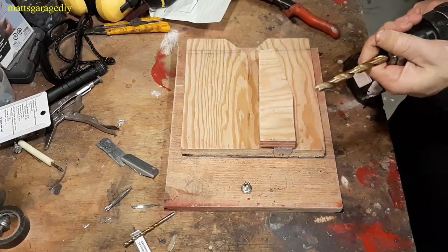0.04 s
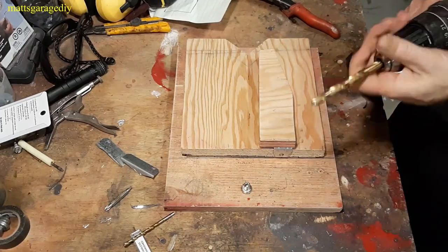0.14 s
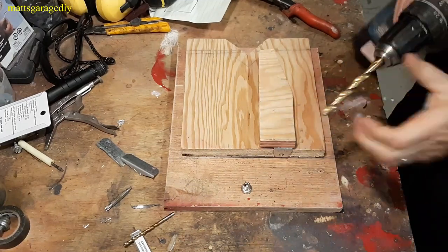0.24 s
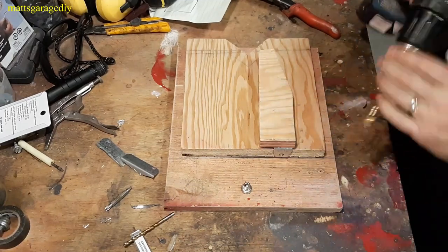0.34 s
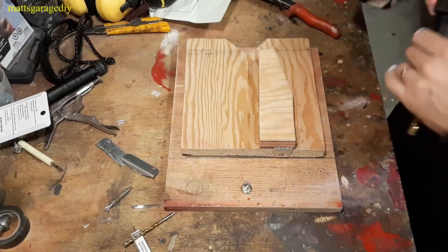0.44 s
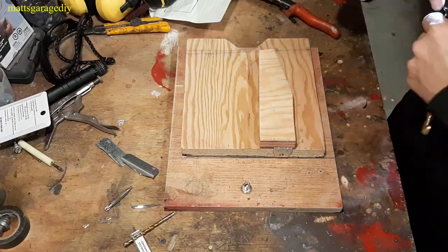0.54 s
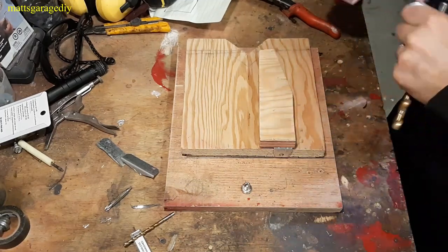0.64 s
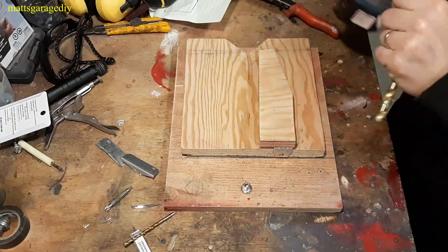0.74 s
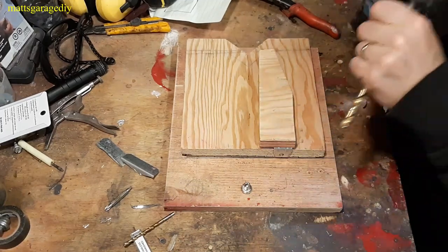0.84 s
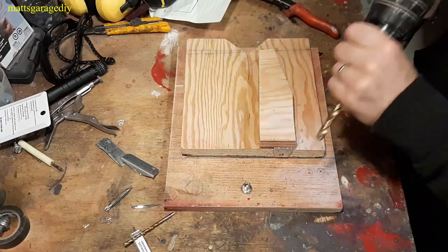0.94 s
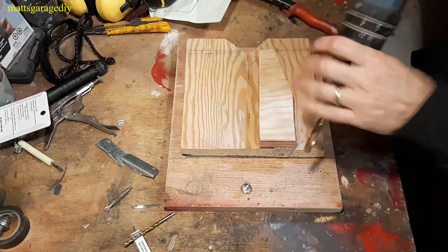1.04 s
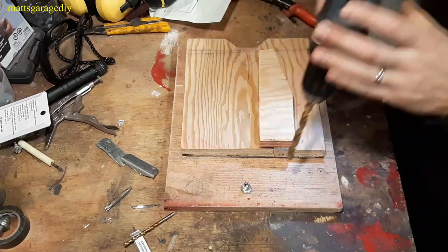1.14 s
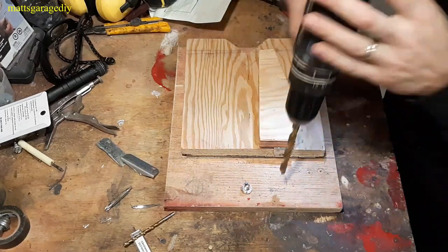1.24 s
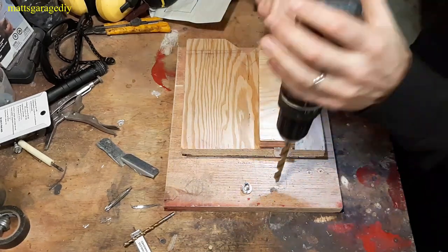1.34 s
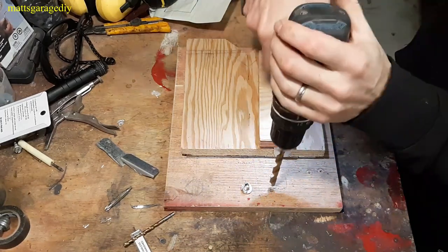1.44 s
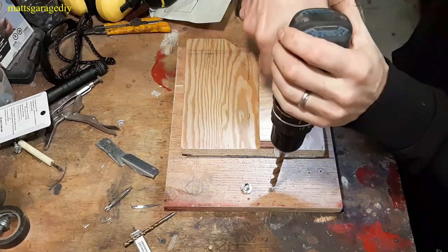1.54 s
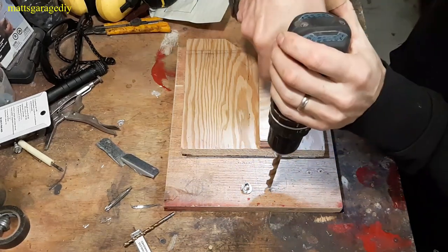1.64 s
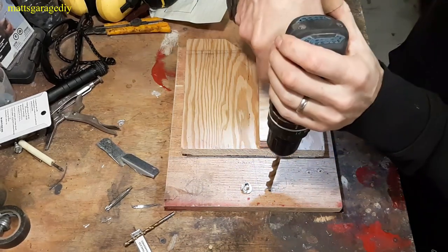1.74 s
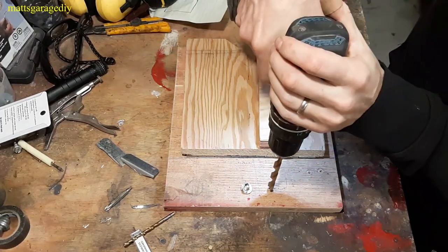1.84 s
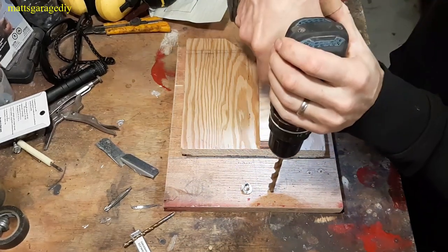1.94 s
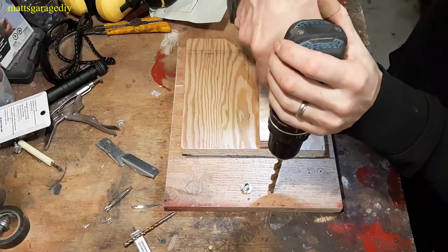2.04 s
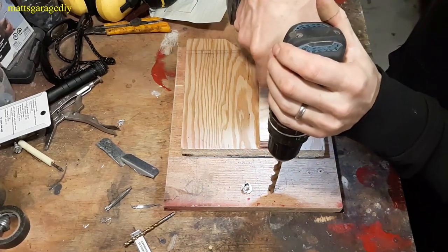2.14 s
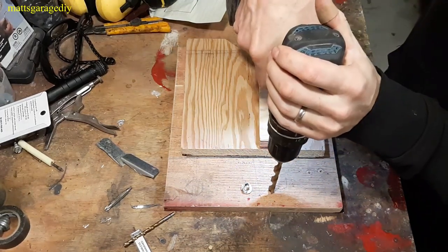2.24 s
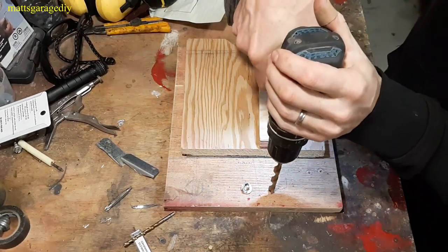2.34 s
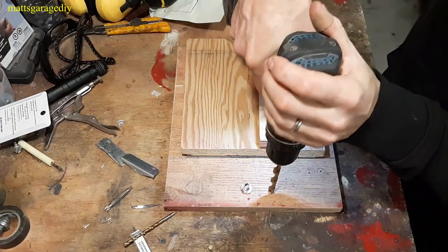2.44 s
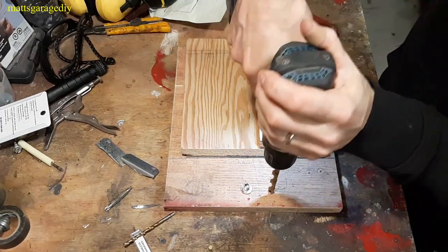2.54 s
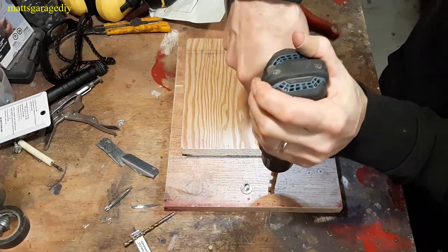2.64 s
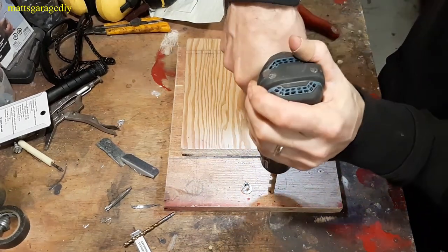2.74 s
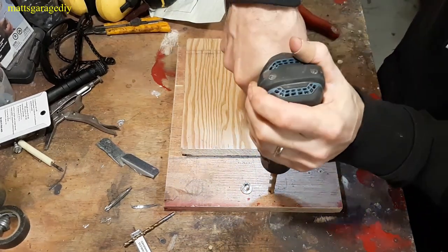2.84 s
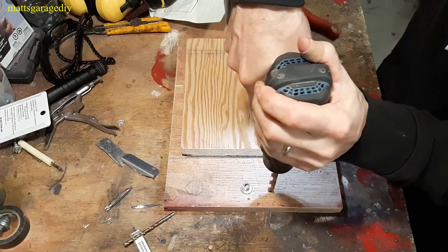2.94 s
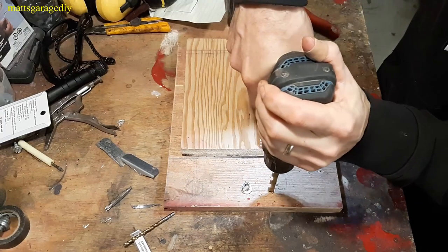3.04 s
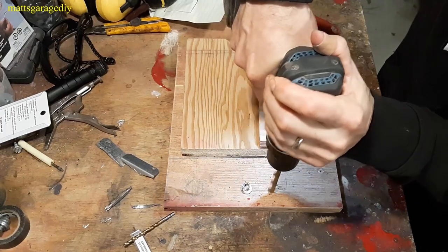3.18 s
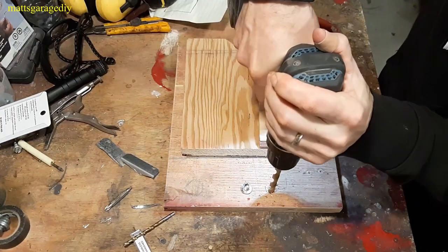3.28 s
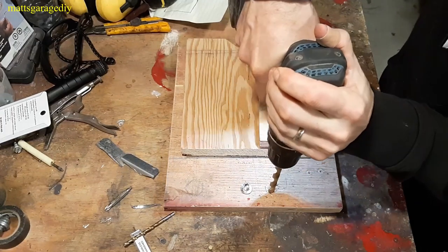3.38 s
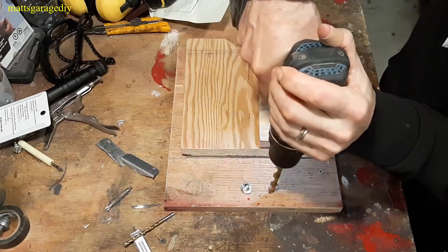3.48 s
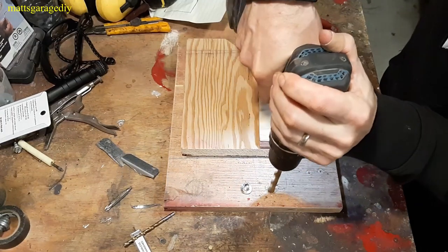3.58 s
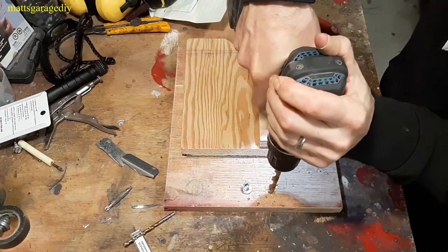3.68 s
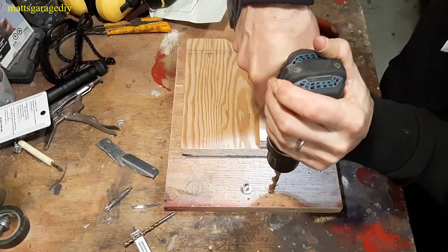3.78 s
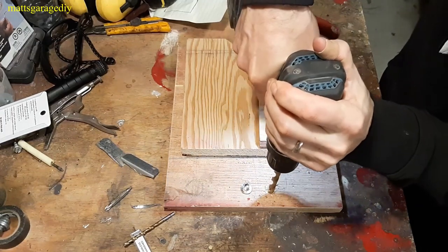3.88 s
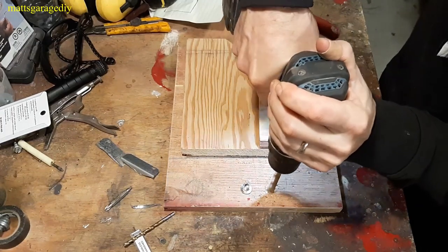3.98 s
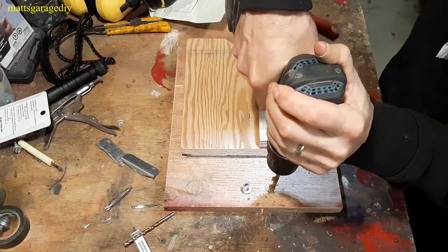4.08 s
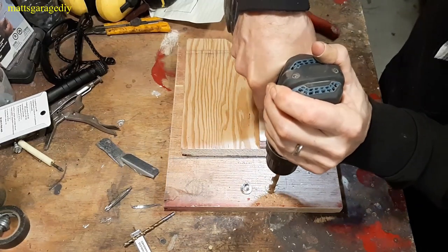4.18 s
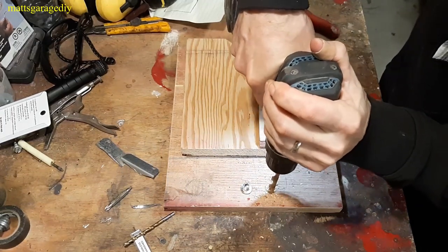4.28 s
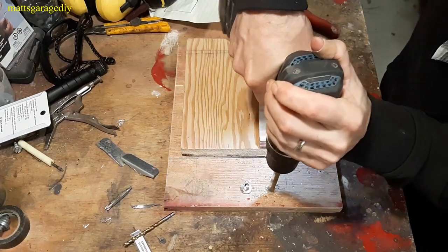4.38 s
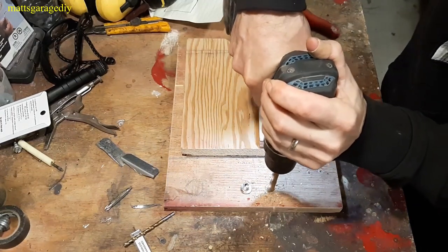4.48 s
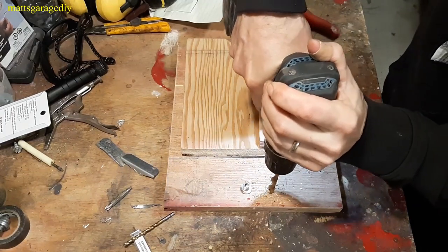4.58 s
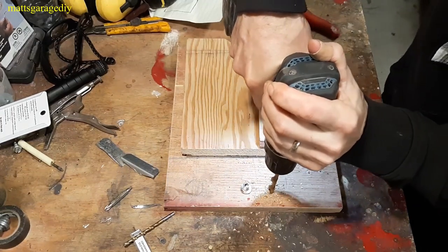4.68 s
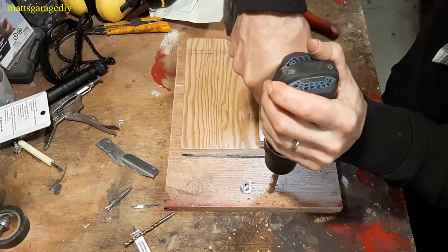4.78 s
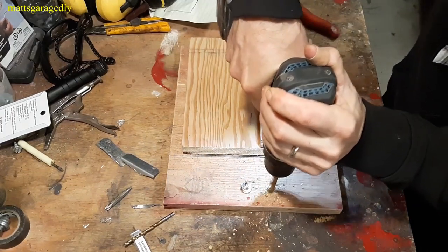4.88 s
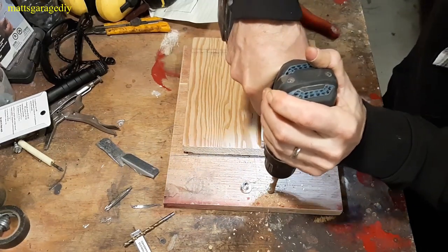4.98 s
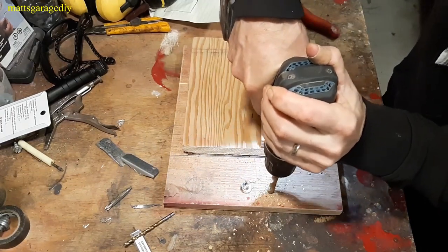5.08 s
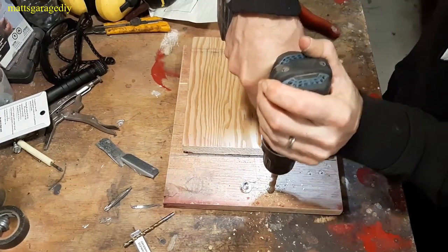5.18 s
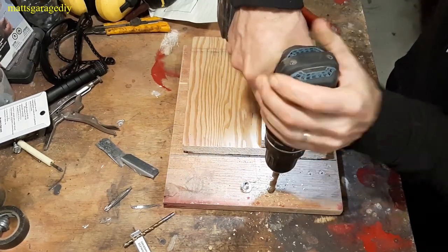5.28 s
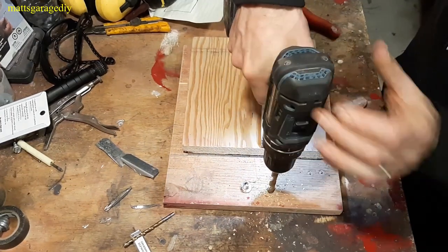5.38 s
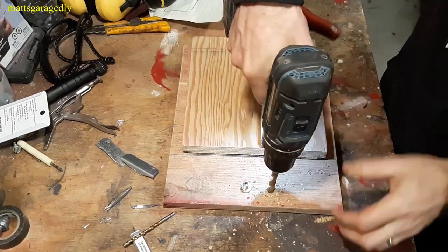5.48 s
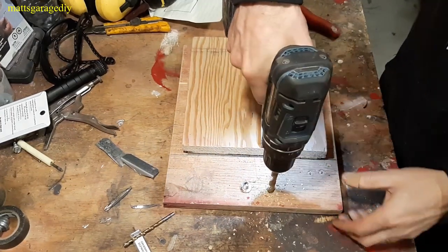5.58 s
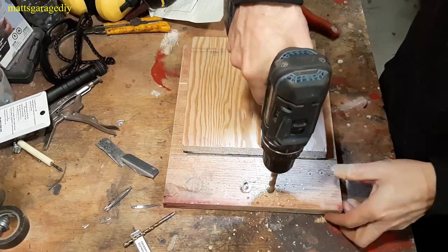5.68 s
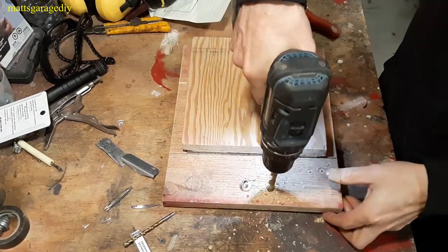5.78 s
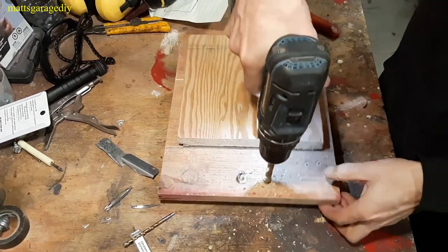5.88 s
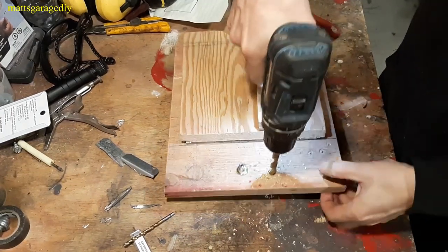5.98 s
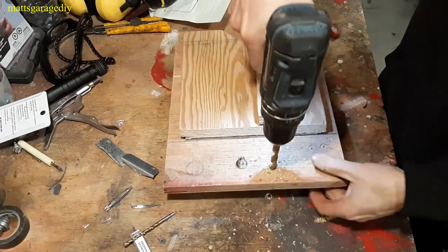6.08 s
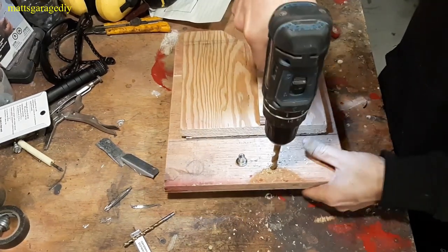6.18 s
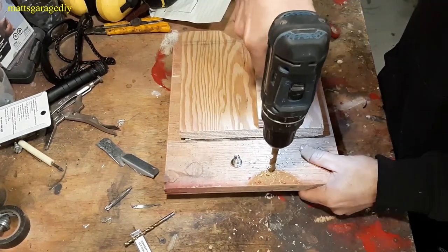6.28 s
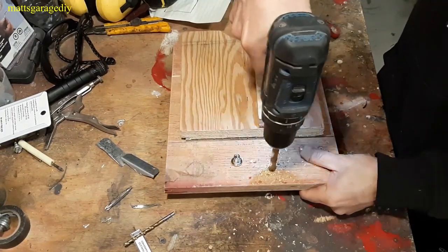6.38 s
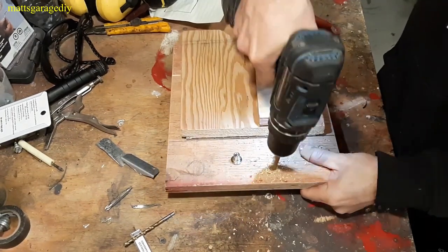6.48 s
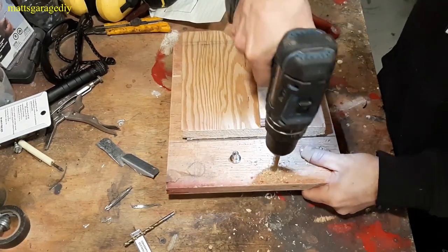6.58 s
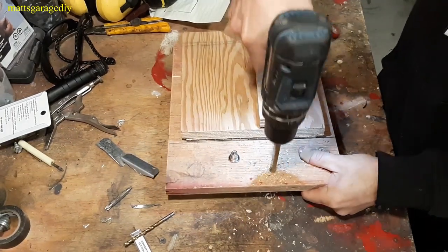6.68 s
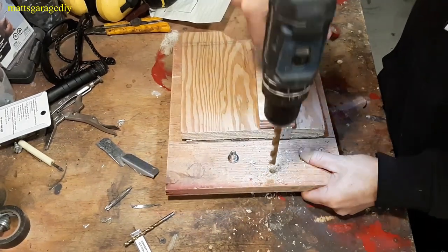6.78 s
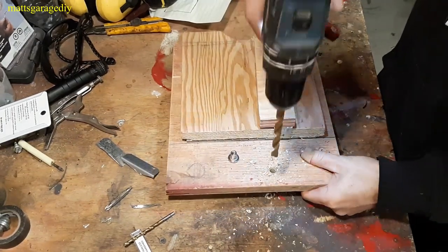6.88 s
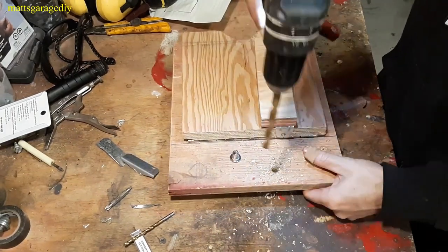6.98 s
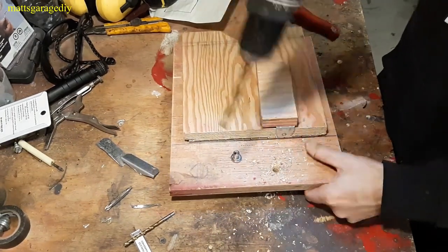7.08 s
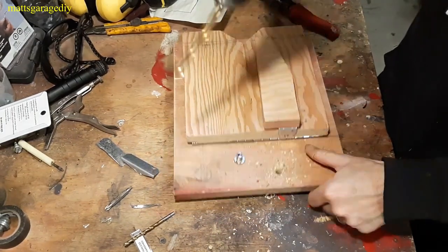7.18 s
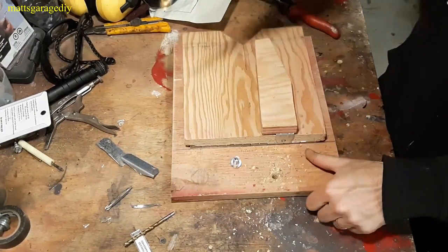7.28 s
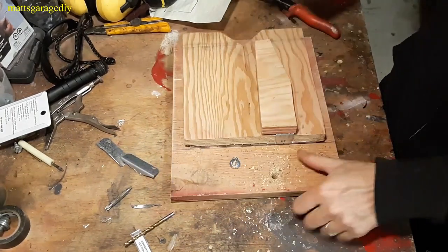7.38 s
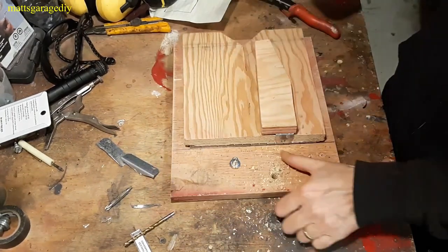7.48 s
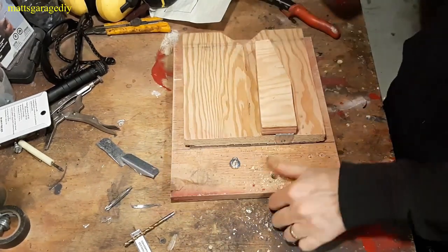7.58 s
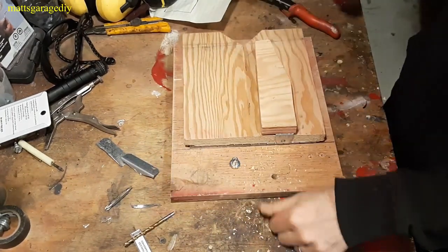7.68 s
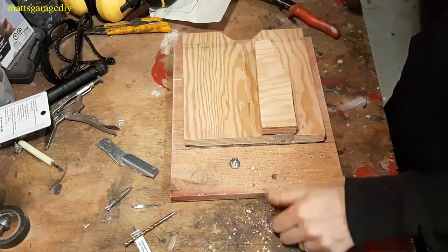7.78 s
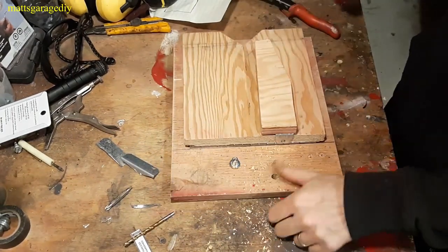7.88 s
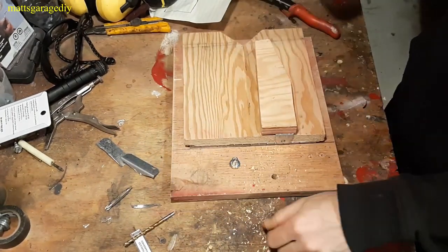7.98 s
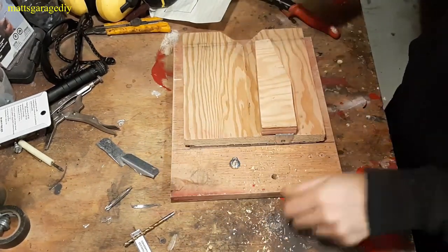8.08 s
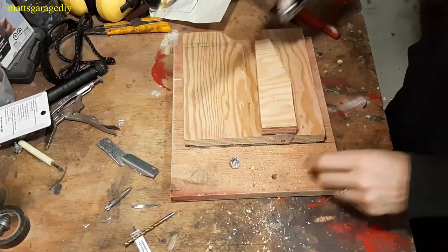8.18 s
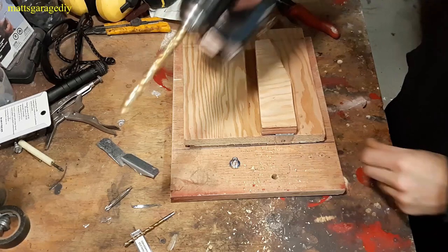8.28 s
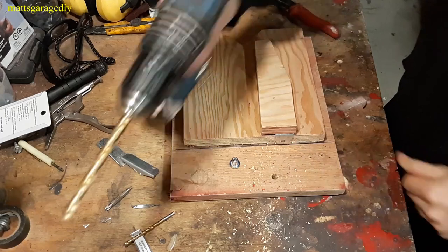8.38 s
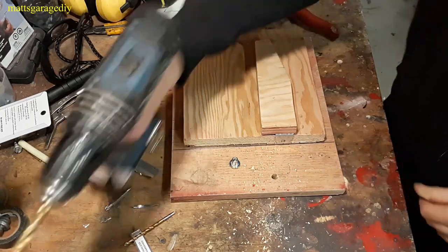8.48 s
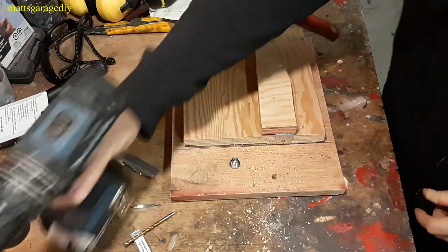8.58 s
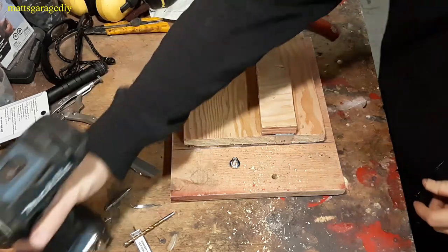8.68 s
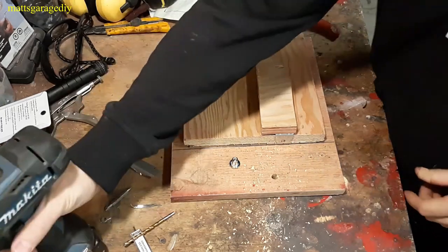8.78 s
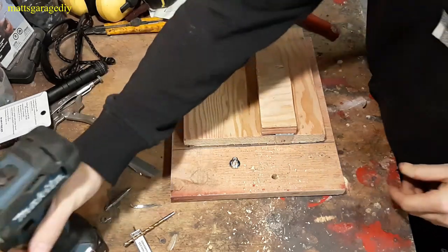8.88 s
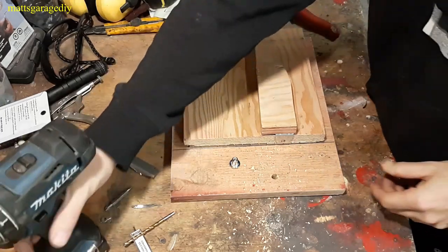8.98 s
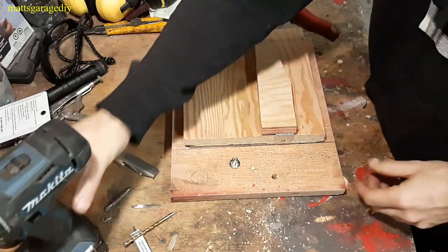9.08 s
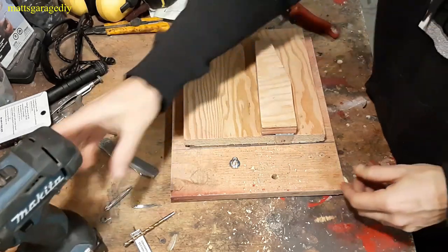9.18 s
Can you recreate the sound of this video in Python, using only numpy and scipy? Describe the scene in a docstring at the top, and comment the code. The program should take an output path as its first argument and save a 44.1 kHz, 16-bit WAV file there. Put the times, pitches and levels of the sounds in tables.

```python
"""Cordless drill in a small garage

A cordless drill is pulsed into a board on a workbench, then reversed out. Sine tones for the gear
whine and shaped noise for the rattle follow the motor speed. Clicks are short noise ticks, bench
thuds are dying sines, and a hand brushing chips off the board is clumpy noise.
Behind them are echoes of the garage, soft room noise and the wavering hum of an appliance."""
import sys
import numpy as np
from scipy import signal
from scipy.fft import rfft, irfft, next_fast_len
from scipy.io import wavfile
from scipy.ndimage import uniform_filter1d

SR = 44100
rng = np.random.default_rng(int(sys.argv[2]) if len(sys.argv) > 2 else 0)


def persist_wave(psi):
    """Save psi, clipped to +-1, as 16-bit WAV."""
    counts = np.round(np.clip(psi, -1, 1) * 32767).astype(np.int16)
    wavfile.write(sys.argv[1], SR, np.atleast_2d(counts).T)


N = 407043  # length in samples

REVERSED_FROM_S = 6  # pulls after this time run backwards
# Ways the board likes to shake. Each row: pitch in Hz, width in Hz, level in dB.
BOARD_MODES = [(690, 50, -3), (1100, 90, 1), (1430, 60, -7), (2050, 90, -5), (2370, 90, -3),
               (3500, 120, -9), (4700, 120, -12)]
# Ways the bench likes to ring. Each row: pitch in Hz, level in dB, time to fall by 60 dB in seconds.
BENCH_MODES = [(74, -4, .1), (92, -1, .12), (190, -1, .1), (345, -3, .09), (520, -9, .07), (690, -12, .05),
               (1030, -13, .045), (1300, -17, .03), (2000, -18, .025), (2550, -20, .02)]


def gain_of(db):
    """Turns decibels into a factor."""
    return 10 ** (np.asarray(db) / 20)


def evened(x):
    """Scales a sound to an average strength (rms) of 1."""
    return x / np.sqrt(np.mean(x ** 2) + 1e-20)


def read(points, hz):
    """Reads between the points of a table, with pitch on a logarithmic scale."""
    f, value = np.transpose(points)
    return np.interp(np.log(hz + 1), np.log(f + 1), value)


def add(mix, s, sound):
    """Mixes in a two-channel sound that starts at s seconds."""
    part = mix[:, round(s * SR):][:, :sound.shape[1]]
    part += sound[:, :part.shape[1]]


def pair(count):
    """Two-channel white noise: deep parts nearly alike left and right, high parts mostly different."""
    # Each row: pitch in Hz, likeness of left and right from 0 to 1.
    likeness = [(100, 0.99), (300, 0.79), (700, 0.24), (1500, 0.26), (6000, 0.19), (14000, 0.12)]
    a, b = rfft(rng.standard_normal((2, count)))
    same = np.clip(read(likeness, np.fft.rfftfreq(count, 1 / SR)), 0, 1)
    return irfft(np.array([a, same * a + np.sqrt(1 - same ** 2) * b]), count)


def coloured(x, slope, peaks=()):
    """Gives noise a smooth spectrum with resonance peaks added on top; the result has rms 1."""
    hz = np.fft.rfftfreq(x.shape[1], 1 / SR)
    power = gain_of(2 * read(slope, hz))  # twice the dB, as this is power
    for centre_hz, width, db in peaks:
        power = power + gain_of(2 * db) / (1 + (2 * (hz - centre_hz) / width) ** 2)
    return evened(irfft(rfft(x) * np.sqrt(power), x.shape[1]))


def wander(count, size):
    """A random curve with rms 1 that changes over about size samples."""
    once = uniform_filter1d(rng.standard_normal(count), size)
    return evened(uniform_filter1d(once, size))


def patchy(x, patchy_db):
    """Lets patches of about 600 Hz by 12 ms swell and sink at random."""
    z = signal.stft(x, nperseg=256, noverlap=192)[2]
    field = uniform_filter1d(rng.standard_normal(z.shape[1:]), size=4, axis=0)
    field = uniform_filter1d(field, size=8, axis=1)
    z = z * gain_of(patchy_db * evened(field))
    return evened(signal.istft(z, nperseg=256, noverlap=192)[1][:, :x.shape[1]])


def motor(on, let_go, braked, spin_up, top_hz, last_hz):
    """Gear tooth rate: spins up, sags once the trigger is let go, then is braked hard."""
    start_hz = 905  # rate as the gears take up
    brake_hz_per_s, brake_s = 94000, .05
    coast_power = 1.2 if on > REVERSED_FROM_S else 1.4  # bend of the sag
    t = np.arange(max(on, 0), braked + brake_s, 1 / SR)
    up = top_hz - (top_hz - start_hz) * np.exp(-(t - on) / spin_up)
    coast = np.clip((t - let_go) / (braked - let_go), 0, 1) ** coast_power
    late = np.maximum(t - braked, 0)  # seconds past the brake
    mesh_hz = np.maximum(up - (top_hz - last_hz) * coast - brake_hz_per_s * late, start_hz)
    return t, mesh_hz, late


def gear_whine(mesh_hz, reverse):
    """Meshing teeth give tones at multiples of the tooth rate, louder where the shell radiates well."""
    # Each row: multiple of the tooth rate, level in dB drilling forward, level in dB in reverse.
    # The second gear stage changes with direction.
    gears = [(.87, -7, -20), (1, -1, -5), (1.16, -20, -5), (1.73, -5, -14), (2, 1, 2), (2.31, -16, -2),
             (3, -5, -4)]
    # How well the shell radiates a tone. Each row: pitch in Hz, level in dB.
    shell_tones = [(1500, -12), (2400, -4), (3150, 1), (3500, -4), (3850, 3), (4500, -5), (5300, 1),
                   (5800, 2), (6200, -1), (6600, 3), (7200, 1), (7500, -7), (8200, -2), (9600, 0),
                   (11000, -6)]
    n = len(mesh_hz)
    turns = np.cumsum(mesh_hz * (1 + .006 * wander(n, size=100))) / SR
    whine = np.zeros((2, n))
    for order, *db in gears:
        radiated_db = db[int(reverse)] + read(shell_tones, order * mesh_hz)
        radiated_db += np.minimum(20 * np.log2(mesh_hz / 2700), 0)  # weaker at low speed
        radiated_db += 2.5 * wander(n, size=350)  # each tone swells and sinks at random
        for side in whine:  # reflections differ at each microphone
            side_gain = gain_of(radiated_db + 1.5 * wander(n, size=300))
            side += side_gain * np.sin(2 * np.pi * (order * turns + .3 * rng.random()))
    return whine


def tooth_rattle(n):
    """Uneven tooth blows shake the plastic shell: grainy noise with the shell's resonances."""
    # Colour of the rattle. Each row: pitch in Hz, relative level per Hz in dB.
    rattle_slope = [(60, -62), (180, -41), (300, -33), (372, -9.5), (885, -13.5), (1120, -9), (2210, -6),
                    (3080, -4), (3350, -3.5), (6520, -4), (7570, -10.5), (16000, -13.5)]
    # Resonances of the plastic shell. Each row: pitch in Hz, width in Hz, level in dB.
    shell_peaks = [(4380, 820, -1), (6820, 290, 0.5), (9470, 1800, -5)]
    grains = gain_of(1.8 * wander(n, size=12) + 1.3 * wander(n, size=150))
    return patchy(coloured(pair(n) * grains, rattle_slope, shell_peaks), patchy_db=1.5)


def burst(on, let_go, braked, spin_up, top_hz, last_hz, rattle_db, whine_db, rumble_db, board_db):
    """One pull of the trigger: whine, rattle, and the bench and board shaking under the bit."""
    take_up_s = 0.023  # the gears take up their slack
    brake_db_per_s = 701.5
    clock, mesh_hz, late = motor(on, let_go, braked, spin_up, top_hz, last_hz)
    n, reverse = len(mesh_hz), on > REVERSED_FROM_S
    mesh_hz = uniform_filter1d(mesh_hz, size=600)
    speed = np.log2(mesh_hz / top_hz)  # in octaves, 0 at full speed

    # Levels follow the speed, in dB per octave.
    rattle_db = rattle_db + 11 * speed - brake_db_per_s * late
    whine_slope = np.where(clock < let_go, 30, -6 if reverse else 40)
    whine_db = whine_db + whine_slope * speed - 2 * brake_db_per_s * late
    rumble_db = rumble_db + 4 * speed

    whine = gear_whine(mesh_hz, reverse)
    rattle = tooth_rattle(n)
    shake = [(hz, 40 + 0.0057 * hz, db) for hz, db, _ in BENCH_MODES[1:5]]
    rumble = coloured(pair(n), [(30, -60.5), (55, -41.5), (80, -22), (500, -27.5), (900, -52.5)], shake)
    board = coloured(pair(n), [(100, -70), (300, -43), (5000, -35.5)], BOARD_MODES[:2])
    board = board * gain_of(board_db + 1.8 * wander(n, size=300))
    shaken = rattle + board + gain_of(rumble_db) * rumble
    sound = gain_of(rattle_db) * shaken + gain_of(whine_db) * whine
    return clock[0], sound * np.minimum((clock - on) / take_up_s, 1)


def click(s, db, hz, fizz_db, body_db, t60=.05):
    """A snap of plastic or steel: a short ring inside a wide tick, placed where the drill is held."""
    # Where the drill is held. Each row: time in seconds, left over right in dB.
    drill_pan = [(.4, -5), (.8, -1.5), (7, -1), (8.9, 2)]
    t = np.arange(SR // 8) / SR
    pan_db = np.interp(s, *np.transpose(drill_pan))
    slope = [(250, body_db - 22.0), (600, body_db + 0.5), (1700, body_db - 8.5), (2600, -13.0),
             (7000, -13), (10000, fizz_db - 11.5), (16000, fizz_db - 10.5)]
    tick = coloured(pair(len(t)), slope, [(hz, .14 * hz, -2)])
    envelope = gain_of(db - 13.5 - 60 * t / t60) * (1 - np.exp(-t / .0006))
    return s, tick * envelope * gain_of([[pan_db / 2], [-pan_db / 2]])


def knock(s, db, centre_hz, hardness_db, body_db, crack_db):
    """A blow rings bench modes, most near the struck spot's note; a board buzz and short crack join in."""
    t = np.arange(SR // 3) / SR
    chance = rng.random((4 * len(BENCH_MODES), 3))
    ring = np.zeros((2, len(t)))
    for (hz, level_db, t60), (a, b, c) in zip(4 * BENCH_MODES, chance):  # four tones a mode
        octaves = np.log2(hz / centre_hz)
        near_db = 8 * np.exp(-(octaves / 0.62) ** 2)
        level_db = level_db + hardness_db * octaves + near_db + 5 * (a - .5)
        lag = np.array([[0], [(c - .5) * min(hz / 250, 3)]])  # higher modes reach the microphones unalike
        ring += gain_of(level_db - 60 * t / t60) * np.sin(2 * np.pi * hz * (.9 + .2 * b) * t + lag)
    body_slope = [(90, -20.0), (200, -7.0), (450, 0.5), (900, -9.0), (1800, -18.5), (5000, -35.5)]
    crack_slope = [(400, -20), (1200, 0), (2500, -2), (4500, -13), (7000, -24), (12000, -30)]
    buzz = gain_of(body_db - 60 * t / 0.11) * coloured(pair(len(t)), body_slope)
    crack = gain_of(crack_db - 60 * t / .05) * coloured(pair(len(t)), crack_slope)  # at its own level
    sound = ring / abs(ring).max() + buzz + crack
    return s, gain_of(db) * sound * (1 - np.exp(-t / .0012))


def stroke(peak, rise, fall, peak_db, fizz_db):
    """Clumped grit under a hand, sleeve or tool dragged over wood rings the board and fizzes."""
    edge_db, bend = -22.5, 0.97  # drop one rise before or one fall after the peak, and its curve
    t = np.arange(-1.5 * rise, 1.5 * fall, 1 / SR)
    db = peak_db + edge_db * np.where(t < 0, -t / rise, t / fall) ** bend
    n = len(t)
    grit = pair(n) * gain_of(2.2 * wander(n, size=25) + 1.3 * wander(n, size=300))
    body = coloured(grit, [(300, -32), (900, -20), (2500, -16), (6000, -22), (8000, -40)], BOARD_MODES)
    body = patchy(body, patchy_db=2.5)
    fizz = coloured(grit, [(4000, -17), (6500, -5.5), (11000, -10.0), (16000, -10)])
    sound = gain_of(db) * (body + gain_of(fizz_db) * fizz)
    return peak + t[0], sound * signal.windows.tukey(n, .1)


def room(x):
    """A dense tail of reflections, each band dying at its own speed."""
    # Each row: pitch in Hz, time to fall by 60 dB in seconds.
    decay = [(100, 0.48), (300, .3), (1000, 0.27), (4000, 0.26), (12000, 0.16)]
    hz, t, z = signal.stft(pair(SR // 2), SR, nperseg=256)
    fade = gain_of(-60 * t / read(decay, hz)[:, None])
    tail = signal.istft(z * fade, SR, nperseg=256)[1]
    tail[:, :200] = 0  # no reflections arrive in the first 4.5 ms
    return signal.fftconvolve(x.mean(0)[None], tail / np.linalg.norm(tail[0]), axes=1)[:, :N]


def appliance_hum():
    """Steady low and middle tones of an appliance, each wavering in level."""
    # Each row: pitch in Hz, level in dB before all tones are lifted alike.
    hum_tones = [(133, -72), (532.9, -89), (1061, -83), (1459, -82), (1593, -84), (2123, -79), (2654, -94),
                 (3052, -88), (3984, -90)]
    t = np.arange(N) / SR
    hum = np.zeros((2, N))
    for hz, db in hum_tones:
        level_db = db + 5.5 + min(hz / 500, 1.5) * wander(N, size=2000)
        shift = np.array([[0], [.3 * rng.random()]]) * (hz > 300)  # right side slightly out of step
        hum += gain_of(level_db) * np.sin(2 * np.pi * (hz * t + shift))
    return hum


def garage_air():
    """Soft room noise with faint bands where it is stronger."""
    # Colour of the room noise. Each row: pitch in Hz, relative level per Hz in dB.
    air_slope = [(15, -53.5), (25, -25.5), (134, -5.5), (354, -18), (1040, -16.5), (1260, -35), (1440, -13),
                 (1840, -25), (2160, -16), (2410, -23.5), (4030, -23.5), (7310, -37.5), (16000, -37)]
    bands = [(1510, 150, -8.5), (3120, 77, -13), (4120, 710, -13.0), (6400, 530, -16.0),
             (13700, 6400, -28.5)]  # pitch in Hz, width in Hz, level in dB
    air = coloured(pair(next_fast_len(N)), air_slope, bands)
    return gain_of(-65.5) * air[:, :N]


def scene():
    """All sources at the bench, then their echoes, the room air and the hum."""
    # Trigger pulls. Each row: trigger touched in seconds, motor on in seconds, let go in seconds,
    # braked in seconds, spin-up time constant in seconds, top tooth rate in Hz, tooth rate it sags
    # towards in Hz, rattle level in dB, whine level in dB, bench rumble in dB relative to the rattle,
    # board ring in dB relative to the rattle, touch click level in dB, contact click level in dB.
    pulls = [(-.13, -0.103, .025, .05, 0.041, 3416, 2950, -19, -27.5, -62, -11, -30, -17),
             (2.8313, 2.872, 2.955, 2.975, 0.048, 3320, 2780, -15.5, -29.5, -16, -21.5, -35, -15.5),
             (3.141, 3.171, 3.25, 3.28, .04, 3130, 2350, -14, -32, -16, -21.5, -26.5, -20.5),
             (3.484, 3.5126, 3.595, 3.638, 0.032, 3484, 2610, -14.5, -25, -15, -26, -28.5, -19),
             (3.912, 3.9389, 4.045, 4.102, 0.033, 3318, 2330, -14, -20, -15.5, -21, -31.5, -18),
             (4.3335, 4.3553, 4.47, 4.543, 0.036, 3446, 2340, -16.5, -22, -13.5, -15.5, -28, -19),
             (4.777, 4.799, 4.915, 4.98, 0.037, 3314, 2330, -16.5, -29, -13.5, -14.5, -30, -18),
             (6.377, 6.4055, 6.575, 6.797, 0.029, 3364, 2340, -16.5, -27.5, -23.5, -11.5, -28, -8.5)]
    # Each row: peak in seconds, rise in seconds, fall in seconds, level in dB,
    # fizz above 6 kHz in dB relative to the body.
    strokes = [(.425, .04, .06, -64.5, 0), (.58, .05, .08, -77, 12), (.72, 0.089, 0.21, -67.5, 10),
               (1.055, .07, 0.055, -78.5, 21), (1.269, 0.044, 0.068, -83, 14), (5.6, 0.018, .11, -58, -9.5),
               (5.8, 0.035, 0.12, -53, -4), (5.835, .03, 0.042, -65, 12), (5.921, 0.078, 0.081, -43, -27),
               (6.039, 0.033, 0.13, -47.5, -8.5), (6.185, 0.094, 0.047, -44, -5),
               (6.249, 0.038, 0.068, -46.5, -25.5), (6.32, .03, .03, -51.5, -14.5),
               (7.02, 0.22, 0.31, -55.5, -9.5), (7.215, .05, 0.042, -40, -13),
               (7.352, 0.022, 0.095, -57, -37), (7.499, 0.14, 0.12, -65.5, 4),
               (7.67, 0.079, 0.045, -36, -6), (7.89, 0.044, .03, -52, -3), (7.959, 0.047, 0.061, -36, -11),
               (8.0, 0.016, .03, -51, -10), (8.361, 0.1, .11, -75.5, 14)]
    # Blows on the bench. Each row: start in seconds, level in dB, note in Hz, hardness in dB per octave,
    # body buzz in dB relative to the ring's peak, crack in dB relative to the ring's peak.
    knocks = [(2.216, -37, 93.1, -3, -27, -27), (2.572, -28.5, 81.4, -10, -23, -28),
              (2.584, -24.5, 188, 3.5, -8.5, -17.5), (4.375, -2.5, 187, 5.5, -11.5, -11.5),
              (5.285, -22, 315, 1, -22, -38), (5.292, -22, 189.5, -3, -10, -28),
              (5.793, -45, 91.5, 3.5, -13.5, -9), (6.038, -38, 86, -17, -40, -22),
              (6.257, -34, 92.3, 0, -22, -15), (6.513, -3, 188, 4, -29, -12),
              (6.791, -34, 690, 11, -15, -5), (7.2537, -1, 1077, 10.5, -29, -22.5),
              (7.265, -22.5, 690, 1, -13, -7), (7.292, -27, 1040, 24, -20, -1.5),
              (7.304, -5, 1070, 9.5, -33, -15.5), (7.329, -16.5, 338, 10, -22.5, -14.5),
              (7.34, -26, 1035, 2, -11, -23), (7.884, -42, 82.8, -14, -14, -9),
              (8.741, -9.5, 335, -1, -6.5, -15), (8.934, -34, 89, -1, -13, -12),
              (8.987, -36.5, 76, -2, -19, -20), (9.055, -38, 91.8, -3, -22, -16.5),
              (9.135, -35, 119, -1.5, -31, -20), (9.195, -46.5, 74, 1, -32, -6)]
    # Chuck, switch and shell clicks. Each row: start in seconds, level in dB, ring in Hz,
    # relative fizz above 9 kHz in dB, relative body under 2 kHz in dB.
    clicks = [(0.387, -42, 3970, -26, -21), (0.4289, -25, 4020, -36, -30), (0.5644, -25.5, 3930, -8, -25),
              (0.633, -37, 3730, -28, -22), (0.6603, -17, 4000, -11, -7), (0.738, -30, 4170, -14, -10),
              (0.759, -12, 10200, 4, -17), (0.7836, -12.5, 11200, 0, -17),
              (0.831, -12.5, 10850, 10.5, -10.5), (2.893, -9, 3570, -19.5, -18),
              (5.726, -40, 6870, -15, -24), (6.8463, -9, 3830, -10, -11), (6.8948, -36, 3850, -28, -22),
              (8.743, -15.5, 5050, -9.5, -10), (8.939, -15, 2040, -5.5, -29),
              (9.1322, -18.5, 2060, -11, -40)]
    bench = np.zeros((2, N))
    for touched, on, *rest, touch_db, contact_db in pulls:
        add(bench, *burst(on, *rest))
        if touched > 0:  # finger meets the trigger, then the switch makes contact
            add(bench, *click(touched, touch_db, hz=6900, fizz_db=-10, body_db=-26, t60=.07))
            add(bench, *click(on, contact_db, hz=3900, fizz_db=-8, body_db=-15, t60=.05))
    for row in clicks:
        add(bench, *click(*row))
    for row in knocks:
        add(bench, *knock(*row))
    for row in strokes:
        add(bench, *stroke(*row))
    return bench + gain_of(-8) * room(bench) + garage_air() + appliance_hum()


def record(dry):
    """Small microphones lose the deep bass and differ in the treble; the top is cut at 15.9 kHz."""
    # Left microphone over right. Each row: pitch in Hz, level in dB.
    left_over_right = [(200, 0), (6000, -0.5), (9000, 0), (13000, 3)]
    size = next_fast_len(N)
    tilt = read(left_over_right, np.fft.rfftfreq(size, 1 / SR)) / 2
    tilted = irfft(rfft(dry, size) * gain_of([tilt, -tilt]), size)[:, :N]
    thin = signal.sosfilt(signal.butter(4, 62, "high", fs=SR, output="sos"), tilted)
    top_cut = signal.firwin(701, 15900, window=("kaiser", 11), fs=SR)
    return signal.oaconvolve(thin, top_cut[None], "same")


dry = scene()
out = record(dry)
persist_wave(out)
```